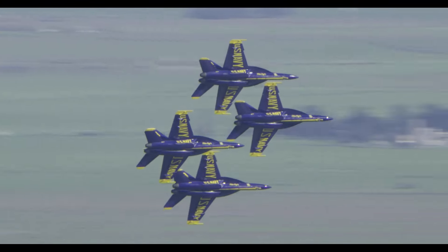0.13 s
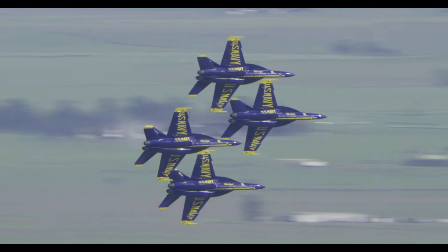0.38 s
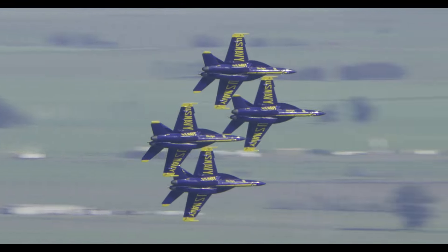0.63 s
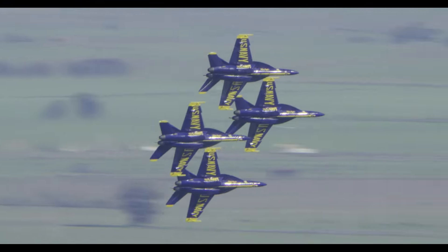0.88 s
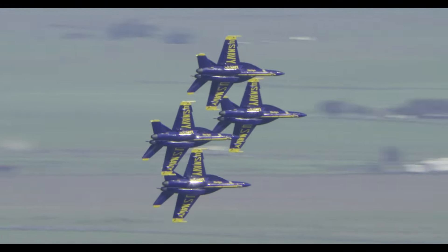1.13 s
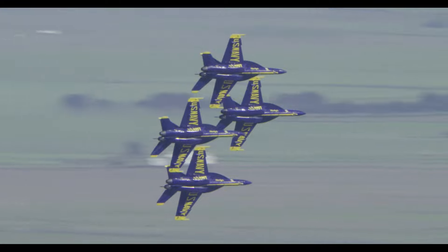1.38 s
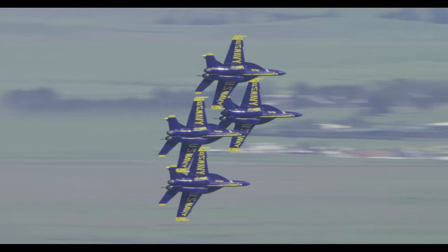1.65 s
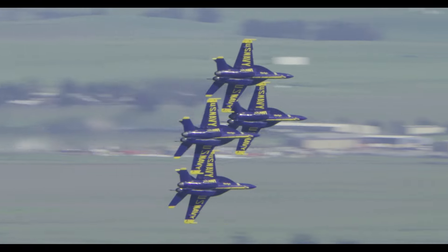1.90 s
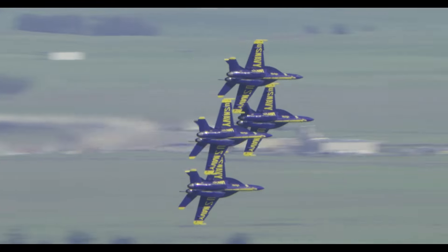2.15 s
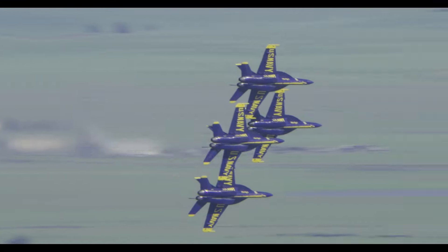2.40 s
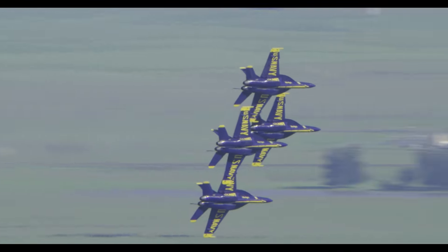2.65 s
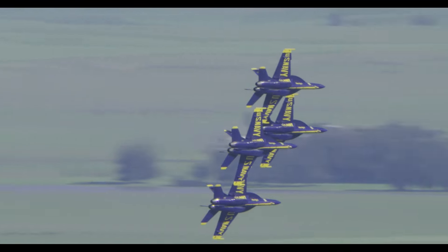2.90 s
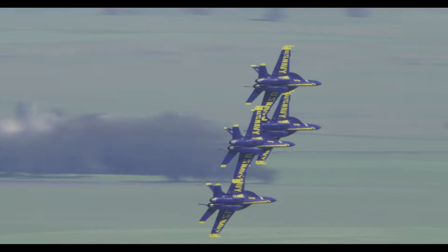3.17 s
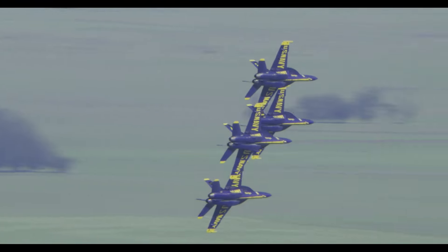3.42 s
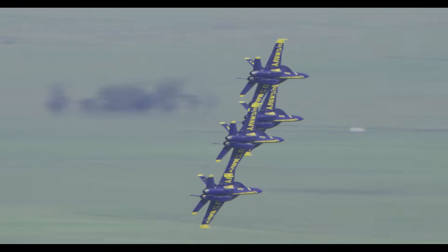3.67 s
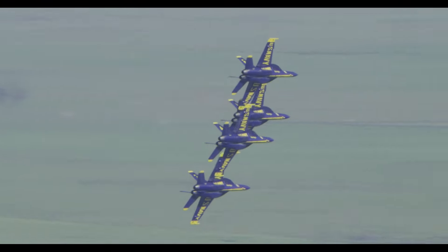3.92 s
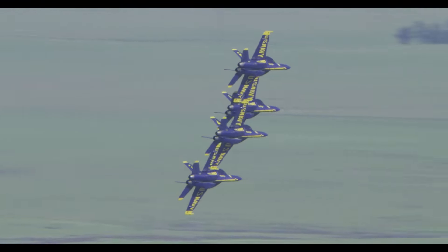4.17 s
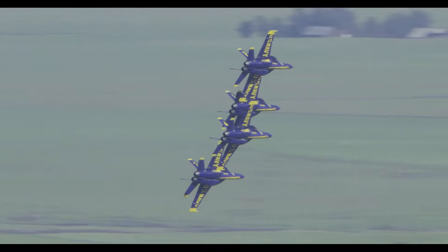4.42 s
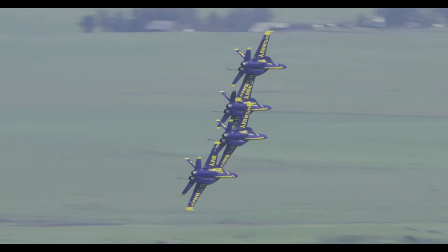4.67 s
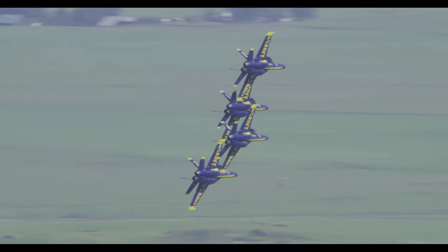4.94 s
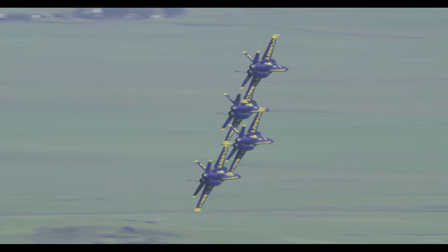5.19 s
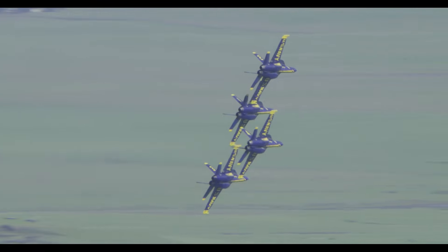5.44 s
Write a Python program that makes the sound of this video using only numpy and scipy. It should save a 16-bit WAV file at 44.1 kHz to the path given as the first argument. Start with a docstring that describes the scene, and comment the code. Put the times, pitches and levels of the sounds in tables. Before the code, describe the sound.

Several jets far across open fields make one continuous dull, muffled roar, its low and middle parts swelling and fading separately. It strengthens around one and a half seconds, dips, then surges again near three. A light breeze softly thumps the microphone around two seconds, with faint rustles. Small dry ticks come before three and four seconds, then a tiny rising squeak. Mono, outdoors, steady faint hiss.

```python
"""From the start, jets in formation far across open fields send a dull roar through a long path of air.
Eddies along the path make its low, middle and upper parts, bands of one noise, swell and fade apart.
An airy wash flickers over steady microphone hiss. A breeze of low noise soon buffets the microphone, then
adds soft thumps, as brief grainy noises rustle close by. Just before three seconds and again before four the
camera body ticks, its struck modes ringing; near four and a half a tiny squeak of two gliding tones rises."""
import sys
import numpy as np
from scipy import signal
from scipy.fft import rfft, irfft
from scipy.io import wavfile
from scipy.ndimage import uniform_filter1d

SR = 44100
rng = np.random.default_rng(int(sys.argv[2]) if len(sys.argv) > 2 else 0)


def to_linear_factor(level_db):
    """Convert decibel levels (scalar or array-like) to linear amplitude factors."""
    exponent = np.asarray(level_db, float) / 20
    return 10 ** exponent


def to_wav(s):
    """Save 16-bit WAV."""
    ch = np.atleast_2d(s).T  # columns
    pcm = np.round(np.clip(ch, -1, 1) * 32767)  # PCM
    wavfile.write(sys.argv[1], SR, pcm.astype(np.int16))


N = 245195
T = np.arange(N) / SR  # time in seconds


def curve(points):
    """Linear interpolation: (s, value) points become a value at every sample."""
    return np.interp(T, *np.transpose(points))


def spectrum(points):
    """Spectral shaping: white noise takes the colour of (Hz, dB) points at rms 1; also gives log Hz."""
    hz, db = np.transpose(points)
    log_hz = np.log(np.fft.rfftfreq(N, 1 / SR) + 1)
    gain = to_linear_factor(np.interp(log_hz, np.log(hz), db, left=-120, right=-120))
    shape = rfft(rng.standard_normal(N)) * gain
    return shape / np.std(irfft(shape, N)), log_hz


def noise(points):
    """Inverse Fourier transform: the shaped spectrum becomes a noise in time."""
    return irfft(spectrum(points)[0], N)


def walk(rate):
    """Smoothed random process: values held 1 / rate s are averaged twice over that time; spread near 1."""
    hold = int(SR / rate)
    steps = np.repeat(rng.standard_normal(N // hold + 1), hold)
    return 1.3 * uniform_filter1d(uniform_filter1d(steps, hold), hold)[:N]


# Colour of microphone self-noise. Each row: frequency in Hz, relative level in dB per Hz.
HISS = [(1000, -4.5), (1900, 0), (3200, -1), (12000, -3.5), (16000, 1.5)]


def hiss():
    """Stationary noise: the microphone's own hiss keeps one colour and one level."""
    return to_linear_factor(-82.5) * noise(HISS)  # rms in dB


# Colour of the airy wash. Each row: frequency in Hz, relative level in dB per Hz.
WASH = [(1000, -10), (1500, 2), (1900, 1), (2600, -6), (3600, -13), (6000, -30)]
# Course of the wash, about which it flickers. Each row: time in seconds, level in dB.
WASH_LEVEL = [(0, -86), (.5, -85.5), (1.3, -85.5), (1.7, -86.5), (2.1, -85.5), (2.5, -85.5), (2.9, -86),
              (4.0, -87), (5.0, -87.5), (5.56, -86.5)]


def wash(gust_db=1.5, gust_rate=45.0):
    """Amplitude modulation: quick random gusts make a thin airy noise flicker."""
    level_db = curve(WASH_LEVEL) + gust_db * walk(gust_rate)
    return to_linear_factor(level_db) * noise(WASH)


# Breeze on the microphone, about which it flutters. Each row: time in seconds, level in dB.
BREEZE = [(0, -83), (.3, -77), (.65, -66.5), (1.15, -71), (1.7, -69), (2.1, -66), (2.5, -65), (2.78, -68),
          (2.86, -74), (2.95, -79), (3.55, -84), (3.9, -81.5), (4.6, -80), (5.3, -76.5), (5.56, -74)]
# Colour of the buffeting. Each row: frequency in Hz, relative level in dB per Hz.
BUFFET = [(8, -2), (30, -1), (60, -1), (100, -16), (200, -45)]
# Strongest puffs, each a soft thump. Each row: centre in seconds, envelope peak in dB, frequency in Hz.
PUFFS = [(1.33, -60, 35), (1.59, -60, 35), (1.72, -57, 42), (2.21, -45, 36), (2.37, -52, 40),
         (2.5, -52, 30), (2.56, -50, 60), (2.67, -56, 55), (2.75, -58, 30), (2.83, -61, 35),
         (3.16, -62, 35)]


def breeze(gust_db=3.0, puff_s=.05):
    """Turbulent pressure: low noise flutters in level; stronger puffs are low tones in bell-shaped swells."""
    level_db = curve(BREEZE) + gust_db * walk(13)
    out = to_linear_factor(level_db) * noise(BUFFET)
    for s, db, hz in PUFFS:
        swell = to_linear_factor(db) * np.exp(-(2 * (T - s) / puff_s) ** 2)
        out = out + swell * np.sin(2 * np.pi * (hz * T + rng.random()))
    return out


# Colour of the rustling. Each row: frequency in Hz, relative level in dB per Hz.
RUSTLE = [(900, -30), (1700, 0), (2300, -6), (3300, -8), (5000, -22), (12000, -40)]
# Faint rustles close by. Each row: centre in seconds, length in seconds, level in dB before the grain.
RUSTLES = [(1.88, .04, -85), (2.112, .03, -84), (2.22, .02, -89), (2.495, .012, -80.5), (2.525, .04, -82),
           (2.8, .016, -83)]


def rustles(grain_db=2.5):
    """Friction noise: brief brushes, as of cloth or grass, are coloured noise with a random grain."""
    swell = sum(to_linear_factor(db) * np.exp(-(2 * (T - s) / length) ** 2) for s, length, db in RUSTLES)
    return swell * to_linear_factor(grain_db * walk(150)) * noise(RUSTLE)


# Gliding lines of the squeak. Each row: start in seconds, length in seconds, start frequency in Hz,
# end frequency in Hz, peak level in dB; frequencies and level are those before the roughness.
SQUEAK = [(4.581, .030, 2700, 5900, -79.5), (4.592, .011, 5600, 6150, -82)]


def squeak(rough_hz=60, rough_db=2.5):
    """Frequency modulation: two lines glide upward, made hoarse by random pitch and level."""
    out = 0
    for s, length, low_hz, high_hz, peak_db in SQUEAK:
        x = np.clip((T - s) / length, 0, 1)  # progress through the glide
        hz = low_hz + (high_hz - low_hz) * x + rough_hz * walk(400)
        level = to_linear_factor(peak_db + rough_db * walk(300)) * np.sin(np.pi * x ** 1.5)
        out = out + level * np.sin(2 * np.pi * np.cumsum(hz) / SR)
    return out


# Blows on the camera body. Each row: start in seconds, peak in dB, place of the blow from 0 to 1.
TICKS = [(2.8690, -52.5, 0), (3.7226, -57.5, 1)]
# Modes of the shell. Each row: frequency in Hz, relative level in dB struck at one end, relative level
# in dB struck at the other, 60 dB decay time in seconds.
SHELL = [(1850, -13, -14, .006), (2200, -5, -12, .006), (2750, -8, -11, .006), (2950, -11, -8, .008),
         (3600, -14, -5, .002), (4300, -4, -1, .002), (4900, 1, 0, .002), (5500, 0, -2, .002),
         (6200, -3, -6, .0025), (7000, -4, -15, .003), (7700, -4, -15, .003), (8500, -5, -14, .002),
         (9700, -9, -20, .002), (11800, -11, -28, .0012)]


def ticks():
    """Modal synthesis: a snap amid a millisecond of faint rattle rings the modes of the plastic shell."""
    out, t = np.zeros(N), T[:1024]
    for s, peak_db, place in TICKS:
        ring = 0
        for k, (hz, db, far_db, t60) in enumerate(SHELL):
            mode = to_linear_factor(db + place * (far_db - db) - 60 * t / t60) * np.sin(2 * np.pi * hz * t)
            ring = ring + (-1) ** k * mode  # neighbours in opposite phase
        blow = .03 * np.hanning(64) * rng.standard_normal(64)  # the rattle
        blow[33] += 1  # the snap itself
        tick = np.convolve(ring, blow)
        out[int(s * SR):][:len(tick)] += to_linear_factor(peak_db) * tick / abs(tick).max()
    return out


MEAN_DB = -39  # level about which the roar swings
# Swelling and fading with the air along the path. Each row: time in seconds, level in dB.
ROAR = [(0, -37), (.2, -42.5), (.4, -42.5), (.56, -39), (.76, -40.5), (.9, -39), (1.03, -39.5), (1.15, -38),
        (1.28, -39), (1.5, -33), (1.62, -35), (1.8, -35), (2.0, -34.5), (2.3, -35), (2.6, -42.5),
        (2.8, -39), (2.94, -39), (3.06, -35.5), (3.18, -32.5), (3.3, -36.5), (3.5, -37), (3.65, -34.5),
        (3.88, -35.5), (4.05, -38), (4.24, -42), (4.4, -37.5), (4.85, -41.5), (5.0, -37.5), (5.12, -38),
        (5.33, -35), (5.56, -35.5)]
# Five parts of the roar. Each row: centre in Hz, share of the swings.
ZONES = [(234, 0.61), (630, 0.9), (980, 0.82), (1250, 0.55), (1530, 0.7)]
# Their levels against the swings. Each row: time in seconds, then chest, throat, edge, fringe and rim in dB.
BRIGHT = [(0, -1.5, -12, -3.5, -10, -2), (.18, -3.5, -1, -5.5, 0.5, -1), (.35, -2.5, 1.5, -1, -1, -2),
          (.6, 2, -5.5, -3, -1.5, -5), (.9, -1.5, 1.5, 2, -2, -5), (1.05, -3, -3, -3, 4.5, -7),
          (1.2, -0.5, -1, 0, 0.5, -5.5), (1.5, -2.5, -5.5, -5, -4, -5.5), (1.7, 1.8, -3.5, 1.8, 0, -3),
          (2.0, -1, -5.5, 5, -1, -3.5), (2.2, 0.5, -3.2, 2.5, -1.5, 0.5), (2.4, -0.5, -5, 4.5, -1, 1.5),
          (2.65, 0.5, 1.5, 5.5, 1.5, 2), (2.82, -2.5, 1, 3.5, -3, 4), (2.95, -0.5, 3, 6, -1, 4.5),
          (3.15, 2, -3.5, 1.5, -2, 0), (3.3, -2, 4, 2.5, 0.5, 2), (3.45, 2.5, 1, 0.5, 0.5, 0.5),
          (3.62, 3, 6.5, 0, -1.5, 2), (3.801, -1.5, -2, 0.5, -2.5, -0.5), (3.95, -2.5, 4, -3, 0, -1.5),
          (4.14, 2, 4, 5, -1, 4.5), (4.35, 0, 3, -1, -0.5, 3.5), (4.55, 0.5, 0, 2, 0, 1),
          (4.9, -3.5, 2.5, -0.5, -0.5, 2), (5.1, 3, 1.5, 0, 2.5, 0), (5.33, -4.5, -5, -4, -2.5, 1),
          (5.56, -2, -3, -1, -2.5, -1)]
# The body follows the swings alone. Its entries: centre in Hz, share of the swings.
BODY = (480, 1.06)
# Deepest part, against its average. Each row: time in seconds, level in dB.
DEEP = [(0, 0), (.5, 1), (1.0, 1), (1.5, 1), (2.0, 1), (2.5, 1), (2.9, -2), (3.15, 3), (3.4, -3), (3.7, -1),
        (4.1, -2), (4.45, 5), (4.8, 1), (5.2, -3), (5.56, -2)]
# Rumble, against its average. Each row: time in seconds, level in dB.
RUMBLE = [(0, -2.5), (.62, 3), (1.05, 0), (1.5, -1.5), (2.2, 5.5), (2.6, -3), (2.92, 0), (3.03, 9),
          (3.1, 5), (3.18, 10), (3.3, 3), (3.48, -1.5), (3.73, 4.5), (4.12, -6), (4.36, -1), (4.48, 7),
          (4.6, 1), (4.8, -1), (5.2, -3.5), (5.56, -0.5)]
# Heart of the roar and its bright shoulder; only their movement about their own mean power counts.
# Each row: time in seconds, heart in dB, shoulder in dB.
HEART = [(0.0, -47.5, -59.5), (0.17, -47.5, -56.5), (1.02, -44, -53), (1.27, -43.5, -54.5),
         (1.86, -39, -46.5), (1.9, -43, -50.5), (2.01, -36.5, -47.5), (2.14, -43.5, -51.5),
         (2.28, -40.5, -45), (2.31, -41.5, -52), (2.52, -45, -49), (2.76, -44, -53.5), (2.96, -47, -45),
         (3.06, -36, -46.5), (3.1, -43, -46), (3.14, -36.5, -45), (3.39, -43.5, -50), (3.53, -38.5, -47),
         (4.01, -41.5, -48.5), (4.06, -41, -56), (4.09, -40.5, -45), (4.2, -47, -51), (4.24, -43, -48.5),
         (4.75, -44, -54), (4.78, -44.5, -47.5), (4.81, -49, -54.5), (5.02, -39, -49), (5.08, -45, -50),
         (5.3, -39.5, -50), (5.56, -44.5, -50.5)]
# Their centres: heart in Hz, shoulder in Hz.
HEART_HZ = (345, 800)


def path_fading(heart_lift_db=1.5):
    """Scintillation: eddies along the path fade each part of the roar apart; gives centres and levels."""
    swing_db = curve(ROAR) - MEAN_DB
    parts = [(68, curve(DEEP)), (125, curve(RUMBLE)), (BODY[0], BODY[1] * swing_db)]  # (Hz, dB)
    s, *own_db = np.transpose(BRIGHT)
    for (hz, share), db in zip(ZONES, own_db):
        parts.append((hz, share * swing_db + np.interp(T, s, db)))
    s, *heart_db = np.transpose(HEART)
    for hz, db in zip(HEART_HZ, heart_db):
        gain = to_linear_factor(np.interp(T, s, db))
        relative = gain / np.sqrt(np.mean(gain ** 2))
        parts.append((hz, 20 * np.log10(relative) + heart_lift_db))  # mean power above the resting roar
    parts.sort(key=lambda part: part[0])
    return np.log([hz for hz, _ in parts]), np.array([db for _, db in parts])


# Exhaust roar after the long air path. Each row: frequency in Hz, relative level in dB per Hz.
EXHAUST = [(40, -48), (70, -23), (120, -13), (180, -10), (326, 0.5), (420, 0), (532, -4.5), (724, -6.5),
           (919, -13.5), (1150, -22.5), (1300, -29), (1420, -36.5), (1650, -49), (2200, -81.5)]


def jets(eddy_db=0.81, eddy_rate=4.364, lump_db=0.45, lump_rate=14.0):
    """Filter bank: third-octave bands of one noise follow the fading, own small eddies and shared lumps."""
    log_zones, fading_db = path_fading()
    shape, log_hz = spectrum(EXHAUST)
    step = np.log(2) / 3  # a third of an octave
    out = 0
    for centre in np.arange(np.log(30), np.log(2800), step):
        # triangular bands overlap and add up to the whole noise
        band = irfft(shape * np.clip(1 - abs(log_hz - centre) / step, 0, 1), N)
        # each band blends the fading of the two nearest parts
        share = [np.interp(centre, log_zones, row) for row in np.eye(len(log_zones))]
        out = out + band * to_linear_factor(share @ fading_db + eddy_db * walk(eddy_rate))
    return out * to_linear_factor(MEAN_DB + lump_db * walk(lump_rate))


def scene():
    """Superposition: the pressures of wash, breeze, small sounds and roar add in one channel."""
    return (wash() + breeze() + rustles() + squeak() + ticks() + jets())[None]


def band_limit(x):
    """A steep low-pass at the top of the band."""
    return signal.sosfilt(signal.butter(12, 15740, fs=SR, output="sos"), x)


def record(dry):
    """Additive noise: the microphone adds its hiss to the scene."""
    mix = dry + hiss()
    return band_limit(mix)


dry = scene()
out = record(dry)
to_wav(out)
```